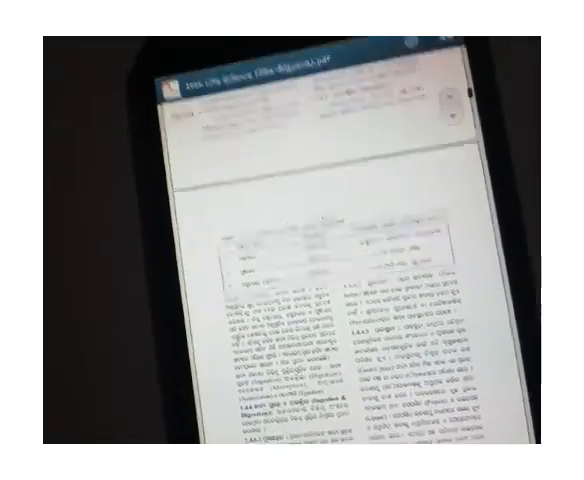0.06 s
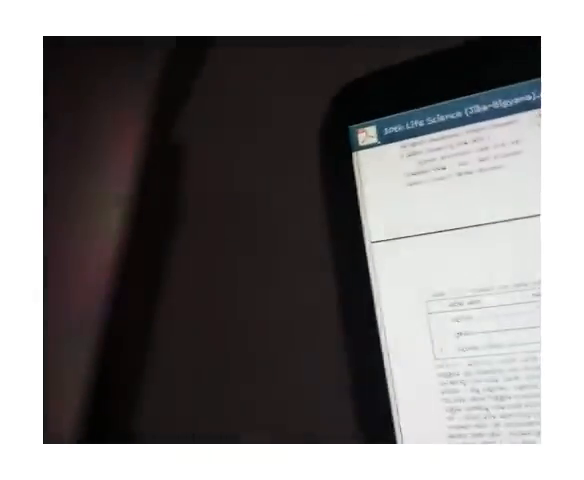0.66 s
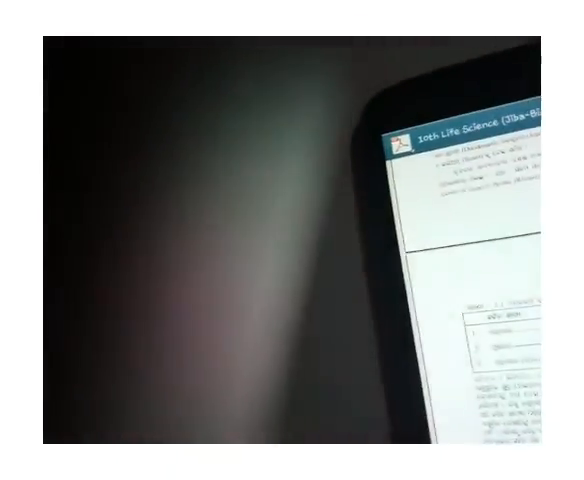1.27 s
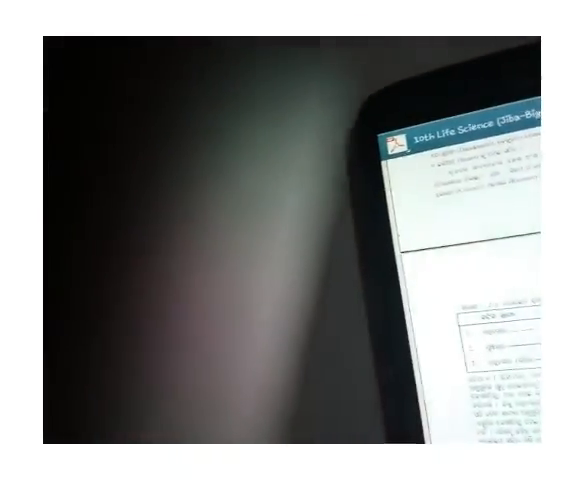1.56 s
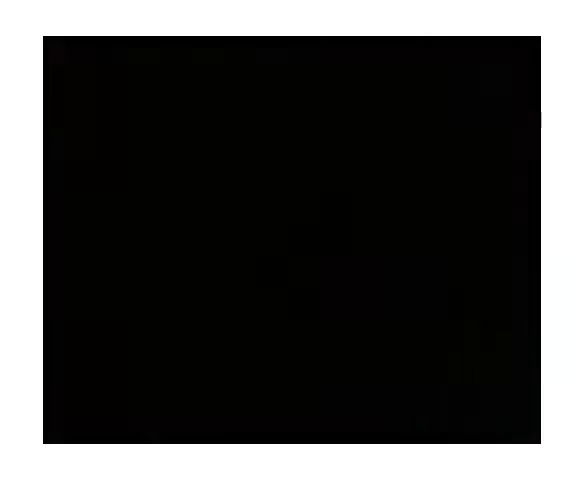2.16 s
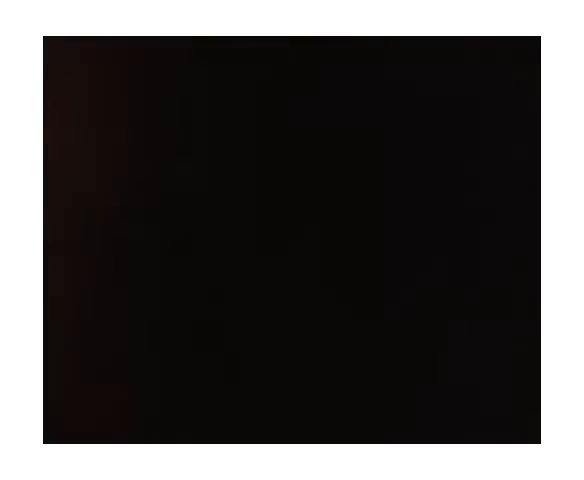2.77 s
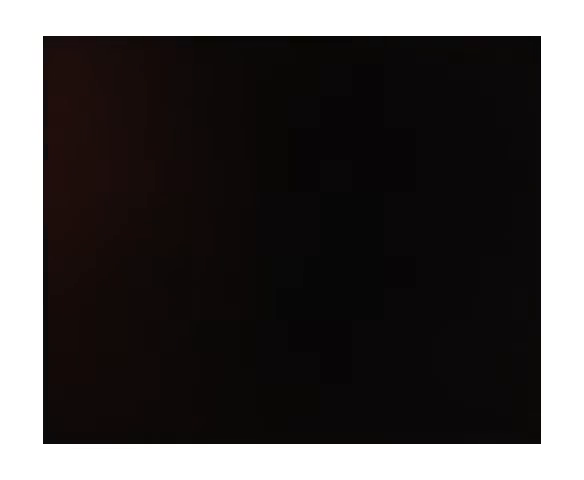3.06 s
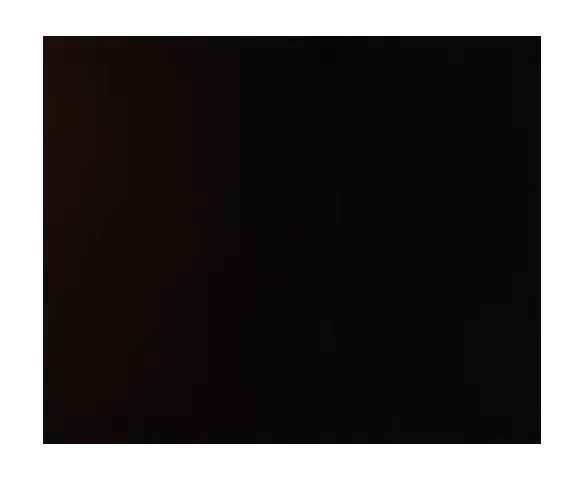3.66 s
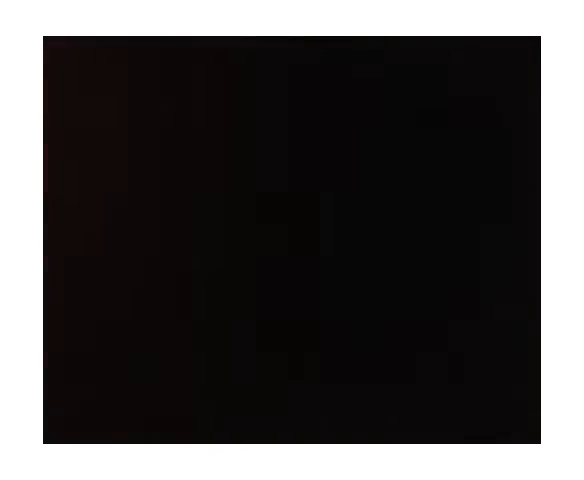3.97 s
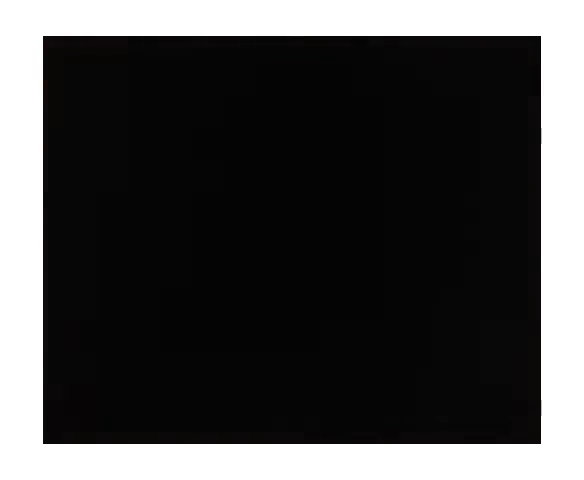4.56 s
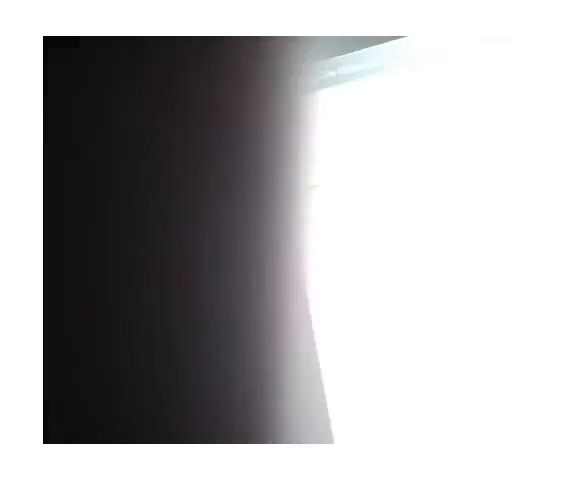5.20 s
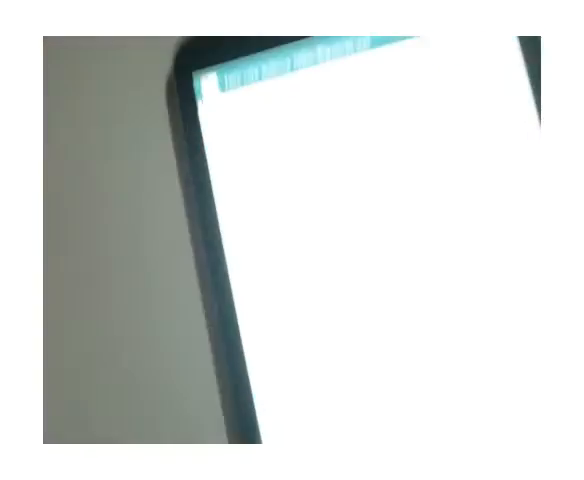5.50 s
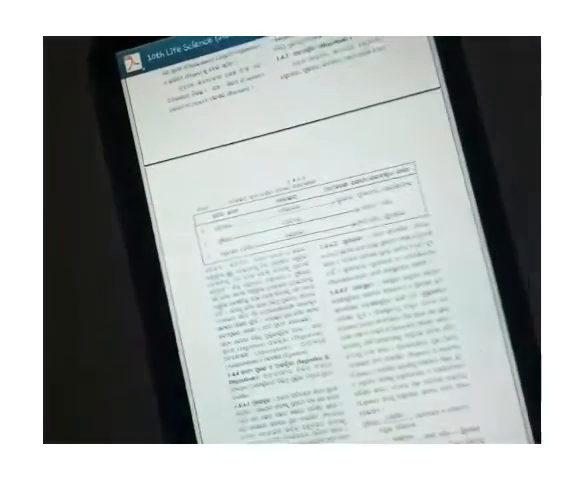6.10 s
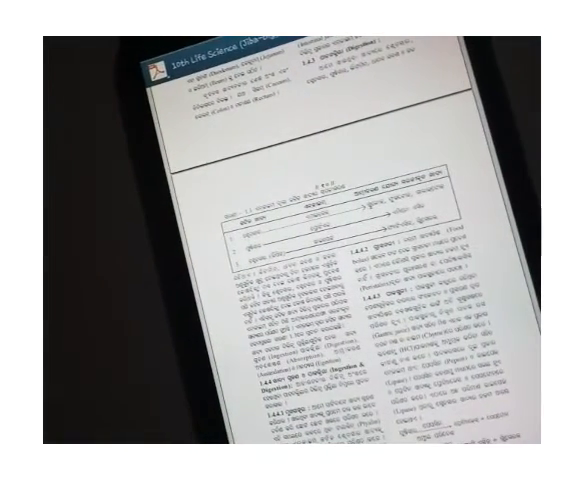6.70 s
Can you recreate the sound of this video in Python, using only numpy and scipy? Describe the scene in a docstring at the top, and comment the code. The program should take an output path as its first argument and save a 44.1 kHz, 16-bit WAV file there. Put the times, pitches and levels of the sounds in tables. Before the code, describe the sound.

Close, irregular taps, dull knocks and brief rubs of a handheld device being handled, with faint room hiss underneath.

```python
"""Fingers on a tablet case

A phone is carried round a tablet in a quiet room: fingers tap, rub and scratch the case, right by the
microphones. A few small clacks come from further off, over a steady hiss that the hand partly muffles.
The hardest tap overloads the input; the gain control ducks, holds and slowly comes back."""
import sys
import numpy as np
from scipy import signal
from scipy.fft import rfft, irfft, next_fast_len
from scipy.io import wavfile
from scipy.ndimage import uniform_filter1d, map_coordinates

SR = 44100
rng = np.random.default_rng(int(sys.argv[2]) if len(sys.argv) > 2 else 0)


def unload_audio(sound):
    """Save the sound as a 16-bit wav file, at the path given as the first command line argument."""
    columns = np.transpose(np.atleast_2d(sound))
    # keep every value between -1 and 1, then stretch to whole-number steps
    steps = np.round(np.clip(columns, -1, 1) * 32767)
    wavfile.write(sys.argv[1], SR, steps.astype(np.int16))


N = 306186


def amp(db):
    """Decibels to gain."""
    return 10 ** (np.asarray(db) / 20)


def unit(x):
    """Scale to rms 1."""
    return x / np.sqrt(np.mean(x ** 2) + 1e-20)


def along(points, hz):
    """Read (freq_hz, value) points on a log frequency axis."""
    freqs, values = np.transpose(points)
    return np.interp(np.log(hz + 1), np.log(freqs), values)


def curve(rows):
    """An envelope through (time_s, value) rows."""
    return np.interp(np.arange(N) / SR, *np.transpose(rows))


def wobble(rate):
    """A smooth random curve, rate knots a second."""
    knots = rng.standard_normal(int(N * rate / SR) + 4)
    return map_coordinates(knots, [np.arange(N) * rate / SR])


def filtered(x, response):
    """Filter x by a complex response of frequency."""
    size = next_fast_len(N + SR // 2)
    return irfft(rfft(x, size) * response(np.fft.rfftfreq(size, 1 / SR)), size)[..., :N]


def noise(spectrum):
    """Noise of rms 1, coloured by (freq_hz, gain_db) points."""
    return unit(filtered(rng.standard_normal(N), lambda hz: amp(along(spectrum, hz))))


def add(track, start_s, sound):
    """Mix a sound into the track."""
    part = track[round(start_s * SR):][:len(sound)]
    part += sound[:len(part)]


def ring(hz, rise_s):
    """A heavily damped swing whose envelope peaks at rise_s."""
    t = np.arange(SR // 12) / SR
    return t / rise_s * np.exp(1 - t / rise_s) * np.sin(2 * np.pi * hz * t)


def resonances(modes, hz):
    """Causal response of a set of modes, falling steeply above each; rms gain 1."""
    response = sum((-1) ** k * amp(db) * pitch * width / (pitch ** 2 - hz ** 2 + 1j * hz * width)
                   for k, (pitch, width, db) in enumerate(modes))
    return response / np.sqrt(np.mean(abs(response) ** 2))


def bursts(events, modes, grain_db):
    """Dying showers of tiny slips that ring a set of modes."""
    t, force = np.arange(SR // 4) / SR, np.zeros(N)
    for start_s, level_db, t60_s in events:
        add(force, start_s, amp(level_db - 60 * t / t60_s))
    slips = unit(rng.standard_normal(N) * amp(grain_db * wobble(2500)))
    return filtered(force * slips, lambda hz: resonances(modes, hz))


def patchy(x, depth_db=1.75, top_hz=1491):
    """Narrow patches of the lows and mids swell and fade at random; the treble stays smooth."""
    hz, _, spectrum = signal.stft(x, SR, nperseg=2048)
    patches = uniform_filter1d(rng.standard_normal(spectrum.shape), size=4, axis=0)
    patches = unit(uniform_filter1d(patches, size=4, axis=1))
    gain = amp(depth_db * patches * (hz < top_hz)[:, None])
    return signal.istft(spectrum * gain, SR, nperseg=2048)[1][:N]


def hiss(level_db=-46.5, waver_db=1.07):
    """Room tone, hollow under the hand and brighter where the microphone port is uncovered."""
    # the room past a cupped hand: freq_hz, gain_db
    cupped_colour = [(25, -16), (70, -2.5), (140, -3), (250, -6.5), (650, -2.5), (820, -12), (1000, -15),
                     (1600, -18.5), (2400, -22), (3100, -26), (4100, -35.5), (6600, -39.5), (8500, -46),
                     (12500, -35.5)]
    # hollow resonances of room and hand: pitch_hz, width_hz, gain_db
    cup_modes = [(155, 38, -4.5), (346, 44, -1.5), (550, 47, -3.5), (653, 64, -10)]
    # left-right likeness of the cupped tone: freq_hz, correlation
    likeness = [(1000, 1), (3100, 1), (6800, 0.93), (10000, 1), (15000, 0.99)]
    # the room at the uncovered port: freq_hz, gain_db
    open_colour = [(150, -21.5), (500, 2), (1000, 6.5), (1450, -0.5), (2100, -6), (2800, -14.5),
                   (3500, -26), (5000, -35), (8000, -56)]
    # how much of it gets in: time_s, level_db
    open_level = [(0, -44.5), (.25, -48), (.7, -53.5), (4.4, -54.5), (4.8, -56), (5.65, -55.5), (6.05, -50),
                  (6.94, -49.5)]
    # a fingertip closes the port before it strikes: time_s, gain_db
    seal = [(4.435, -1.5), (4.452, -9.5), (4.468, -8.5), (4.475, -1)]
    hollow = lambda hz: 1 + sum(amp(db) / (1 + (2 * (hz - pitch) / width) ** 2)
                                for pitch, width, db in cup_modes)
    cupped = np.array([unit(filtered(noise(cupped_colour), hollow)) for _ in range(2)])
    angle = lambda hz: np.arccos(np.clip(along(likeness, hz), -1, 1)) / 2
    spread = lambda hz: np.array([np.cos(angle(hz)), np.sin(angle(hz))])
    mid, side = amp(level_db) * filtered(cupped, spread)
    uncovered = amp(curve(open_level)) * noise(open_colour)
    mid = patchy(mid + uncovered) * amp(waver_db * wobble(4.8))
    return np.array([mid + side, mid - side]) * amp(curve(seal))


def room(x):
    """The small room's reverb, shorter in the treble."""
    # decay of the reflections: freq_hz, t60_s
    decay = [(200, .25), (2000, .25), (12000, 0.18)]
    hz, t, spectrum = signal.stft(rng.standard_normal(SR // 2), SR, nperseg=256)
    fade = amp(-60 * t / along(decay, hz)[:, None])
    tail = signal.istft(spectrum * fade, SR, nperseg=256)[1]
    return signal.fftconvolve(x, tail / np.linalg.norm(tail))[:N]


def clacks():
    """Small hard things knock together, further off."""
    # knocks: start_s, level_db, t60_s
    knocks = [(6.1378, -51, 0.071), (6.222, -33.5, 0.047), (6.6295, -27.5, 0.036), (6.707, -44.5, .05)]
    # the objects' resonances: pitch_hz, width_hz, gain_db
    modes = [(880, 97, -2), (1370, 190, 9), (1700, 160, 2), (2260, 170, 4), (2670, 120, 3), (3160, 200, -3),
             (4250, 240, -18)]
    return bursts(knocks, modes, grain_db=-0.5)


def scratches():
    """A small metal piece is scraped and rings high."""
    # scrapes: start_s, level_db, t60_s
    scrapes = [(2.2485, -51, .04), (2.2556, -43, 0.053), (2.28, -29, 0.042), (4.5455, -50.5, 0.035),
               (5.938, -51.5, 0.21), (6.0255, -43, 0.054)]
    # the metal's resonances: pitch_hz, width_hz, gain_db
    modes = [(4530, 340, -10), (5300, 145, -4.5), (6440, 700, -11.5), (7720, 260, 0.5), (9300, 1400, -7.5),
             (11080, 240, 0), (12730, 380, 1), (14560, 350, -2.5)]
    return bursts(scrapes, modes, grain_db=5.5)


def slides(grain_db=1.5, rise_s=0.14, release_s=0.025):
    """The hand drags along the case: the rasp swells, holds and stops short."""
    # shifts of grip: start_s, end_s, level_db
    drags = [(5.669, 5.947, -49.5), (6.075, 6.307, -41.5)]
    # colour of the rasp: freq_hz, gain_db
    rasp = [(200, -7), (700, -2.5), (1200, 0.5), (2100, 1), (2800, -12), (4500, -17), (8000, -25),
            (11000, -24.5), (16000, -25.5)]
    level = sum(amp(db) * curve([(start, 0), (start + rise_s, 1), (end, 1), (end + release_s, 0)])
                for start, end, db in drags)
    return level * amp(grain_db * wobble(300)) * noise(rasp)


def rubs(grain_db=5.0, quick_s=0.029, catches_per_s=70, catch_db=3, catch_hz=1660, catch_spread=0.29):
    """Skin sticks and slips on the case: a dull rustle, a grainy fizz and a few small catches."""
    # finger strokes: middle_s, half_length_s, body_db, treble_db
    strokes = [(0.926, .011, -44.5, -57), (1.274, .023, -38.5, -56.5), (1.361, 0.032, -47, -62.5),
               (1.615, 0.019, -46, -61.5), (1.903, 0.023, -44, -50.5), (2.386, 0.015, -37, -50),
               (2.943, 0.037, -45, -58), (3.385, .04, -45, -57), (3.738, 0.018, -38, -44.5),
               (4.106, 0.014, -47, -60.5), (4.478, .011, -43.5, -51.5), (4.654, 0.016, -51, -62.5),
               (5.02, 0.031, -42, -60.5), (5.086, .023, -43, -63), (5.34, 0.03, -45, -65.5),
               (5.388, 0.0098, -32, -44.5), (5.452, .024, -41.5, -59), (5.638, 0.021, -39.5, -73),
               (5.87, 0.095, -58, -59.5), (6.047, .02, -40.5, -67), (6.139, 0.0077, -34, -53.5)]
    # the skin's dull rustle: freq_hz, gain_db
    skin = [(40, -17), (110, 2.5), (300, 5), (800, -3.5), (1700, -6.5), (2800, -16), (4000, -47),
            (9000, -50.5)]
    # the fizz on top: freq_hz, gain_db
    fizz = [(1500, -15), (3500, -0.5), (6500, -1.5), (8200, -7.5), (10200, 0), (13000, -13.5), (16000, 0)]
    t = np.arange(N) / SR
    body, treble, catches = np.zeros((3, N))
    slips = wobble(450)
    for middle_s, half_s, body_db, treble_db in strokes:
        grain = unit(amp(grain_db * min(1, quick_s / half_s) * slips))  # slow strokes run smoother
        stroke = grain * np.exp(-np.minimum(((t - middle_s) / half_s) ** 2, 20))
        body += amp(body_db) * stroke
        treble += amp(treble_db) * stroke
    rustle = body * noise(skin) + treble * noise(fizz)
    # catching skin flicks the shell, as hard as the rub is at that moment
    for when, colour in rng.random((int(catches_per_s * N / SR), 2)):
        i = int(when * N)
        hz = catch_hz * np.exp(catch_spread * (2 * colour - 1))
        add(catches, i / SR, amp(catch_db) * body[i] * ring(hz, rise_s=0.00015))
    return rustle + catches


def puffs(swell_cycles=0.36):
    """A finger pad presses air into the port: one or two low swings."""
    # air pops: start_s, level_db, pitch_hz
    pops = [(1.126, -30, 185), (3.725, -18.5, 280), (3.7488, -25.5, 197), (4.4702, -20, 331.5),
            (4.4788, -21.5, 99), (4.495, -40, 80), (4.665, -28.5, 114), (5.3908, -9, 187),
            (5.426, -27, 130)]
    air = np.zeros(N)
    for start_s, level_db, hz in pops:
        add(air, start_s, amp(level_db) * ring(hz, swell_cycles / hz))
    return air


def shove(t, hz=310, level_db=-7, t60_cycles=2.2, attack_s=0.000088):
    """The whole case gives under a finger pad: a short thud."""
    envelope = amp(level_db - 60 * t * hz / t60_cycles) * (1 - np.exp(-t / attack_s))
    return envelope * np.sin(2 * np.pi * hz * t)


def taps(nail_cycles=0.49, pad_cycles=0.14, snap_hz=1860, tick_t60_s=0.0047,
         graze_snap_db=7, graze_tick_db=-0.5):
    """Fingers knock the case wall, flesh damps it; the nail's edge snaps the plastic shell and ticks."""
    # finger strikes: start_s, level_db, pitch_hz, flesh (0 nail to 1 pad), snap_db, tick_db
    strikes = [(1.1227, -24, 1440, .05, -27, -46), (1.126, -16, 690, 1, -50, -40),
               (1.2575, -15, 1460, 0.59, -50, -44), (1.8909, -33, 730, 0.46, -37, -35),
               (1.9106, -24, 860, 0.045, -26.5, -33), (2.2324, -21, 1150, 0.8, -50, -42),
               (2.3837, -26.5, 1420, 0.11, -44, -53), (2.3892, -23, 905, 0.74, -50, -53),
               (2.3925, -18.5, 1510, .2, -23.5, -45), (2.9028, -26, 780, 0.88, -33.5, -55.5),
               (3.3579, -20, 950, 0.86, -29, -33), (3.3669, -5.5, 840, 0.86, -46, -33.5),
               (3.3877, -20.5, 1180, .1, -34, -51), (3.7296, -16, 1390, 0.53, -19.5, -27),
               (3.732, -36, 1500, .1, -14.5, -24), (3.7448, -22.5, 870, 1, -36, -31.5),
               (4.0939, -35.5, 1200, 0.35, -32, -37.5), (4.4699, -14.5, 650, 1, -13.5, -9.5),
               (4.473, -19, 426, 0.54, -21.5, -26), (4.662, -1.5, 640, 0.99, -42, -27.5),
               (4.6919, 3, 1083, 0.015, -44, -36), (4.7608, -19.5, 970, 0.58, -50, -57),
               (4.9996, -22, 448, 1, -30, -42), (5.1335, -23.5, 1000, .3, -28.5, -36.5),
               (5.3908, -6, 470, 0.95, -10.5, -21.5), (5.421, -27, 1200, .1, -38, -62),
               (5.446, -27, 1460, .1, -29, -56), (5.511, -35, 1400, .2, -35, -53),
               (5.6254, -25.5, 930, .4, -29, -46), (6.0318, -24.5, 1370, .3, -45, -48),
               (6.139, -22, 1440, .3, -30, -43), (6.1414, -15, 1420, 0.32, -34, -41),
               (6.1455, -19, 925, 0.23, -20.5, -55), (6.2224, -14, 1570, .05, -15, -31),
               (6.6142, -25, 660, 0.069, -21.5, -55)]
    # a nail only grazes the case: start_s, level_db
    grazes = [(0.9233, -52), (1.3791, -37.5), (4.2077, -49), (4.2906, -49), (4.3258, -45.5),
              (4.6055, -38.5), (4.6214, -44), (4.8209, -40.5)]
    # colour of a nail's tick: freq_hz, gain_db
    tick_colour = [(1500, -33.5), (4000, -11.5), (7000, -0.5), (8500, -6.5), (10200, 4), (16000, -11)]
    t = np.arange(SR // 12) / SR
    body, ticks = np.zeros((2, N))
    edges = [(start_s, db + graze_snap_db, db + graze_tick_db) for start_s, db in grazes]
    for start_s, level_db, hz, flesh, snap_db, tick_db in strikes:
        rise_cycles = nail_cycles + flesh * (pad_cycles - nail_cycles)
        knock = ring(hz, rise_cycles / hz)
        add(body, start_s, amp(level_db) * (knock + flesh * shove(t)))
        edges.append((start_s, snap_db, tick_db))
    for start_s, snap_db, tick_db in edges:
        add(body, start_s, amp(snap_db) * ring(snap_hz, rise_s=0.0001))
        add(ticks, start_s, amp(tick_db - 60 * t / tick_t60_s) * rng.standard_normal(len(t)))
    return body + filtered(ticks, lambda hz: amp(along(tick_colour, hz)))


def scene():
    """Contacts reach the ports through the case, nearly dry; airborne clicks carry some room."""
    background = hiss()
    airborne = scratches() + clacks()
    contact = taps() + puffs() + slides() + rubs()
    reverb = room(amp(-41.5) * contact + amp(-14.5) * airborne)
    return contact + airborne + reverb + background


def gain_control(x, overload=0.9, duck_db=11, attack_s=0.0027, hold_s=1.184, release_s=0.61):
    """After an overload the gain drops fast, is held, then climbs back evenly in dB."""
    t = np.arange(N) / SR
    last_overload_s = np.maximum.accumulate(np.where(abs(x).max(0) > overload, t, -N))
    duck = np.interp(t - last_overload_s, [0, attack_s, hold_s, hold_s + release_s], [0, 1, 1, 0])
    return x * amp(-duck_db * duck)


def record(dry, low_cut_hz=52, top_hz=15900):
    """Two slightly different ports with a steep bass cut, gain control, clipping and a band limit."""
    # balance of the ports: freq_hz, left_minus_right_db
    balance = [(700, 0.05), (2000, 0.9), (3200, 3), (4400, 7), (6300, 9), (8200, 0.5), (10000, -3.5),
               (13000, -0.5)]
    bass_cut = lambda s: (s * s / (1 + 1.53 * s + s * s)) ** 2
    ports = lambda hz: 2 / (1 + amp(np.array([-along(balance, hz), along(balance, hz)])))
    heard = filtered(dry, lambda hz: bass_cut(1j * hz / low_cut_hz) * ports(hz))
    clipped = np.clip(gain_control(heard), -1, 1)
    return filtered(clipped, lambda hz: hz < top_hz)


dry = scene()
out = record(dry)
unload_audio(out)
```